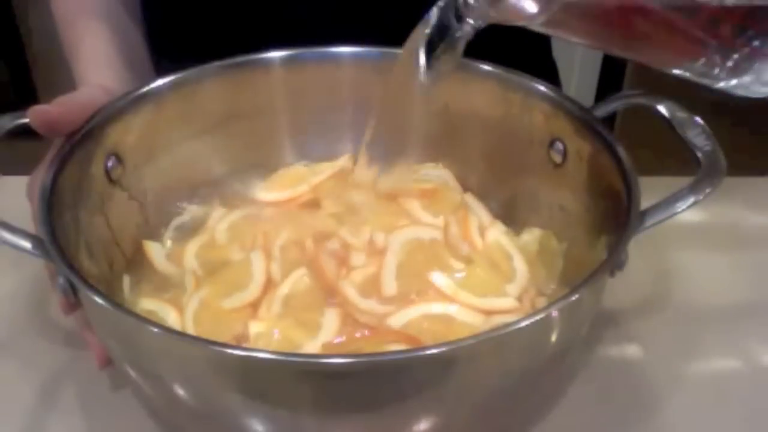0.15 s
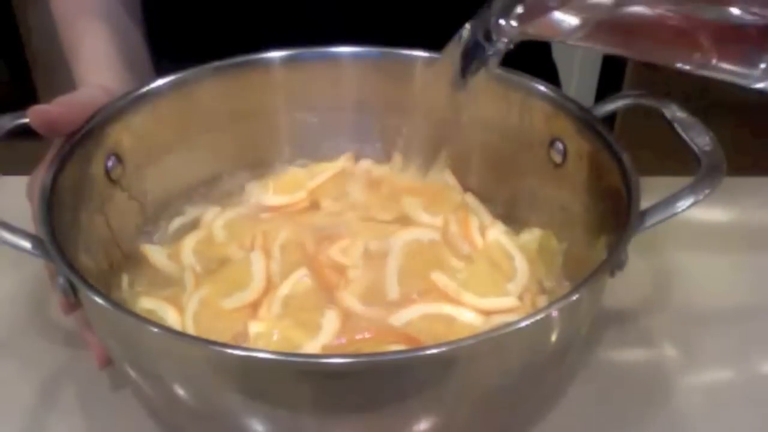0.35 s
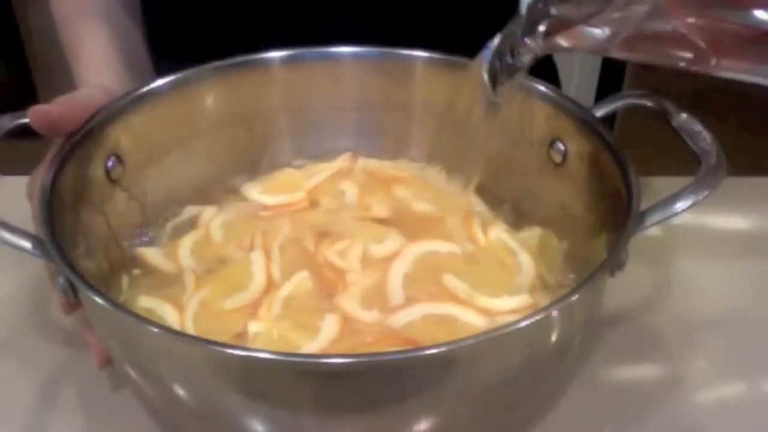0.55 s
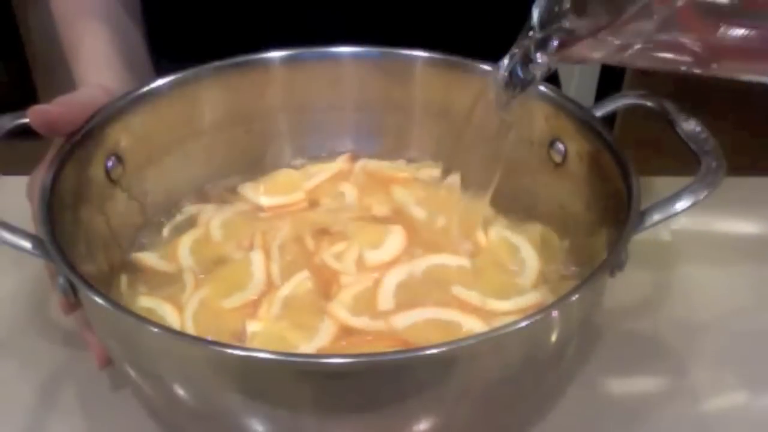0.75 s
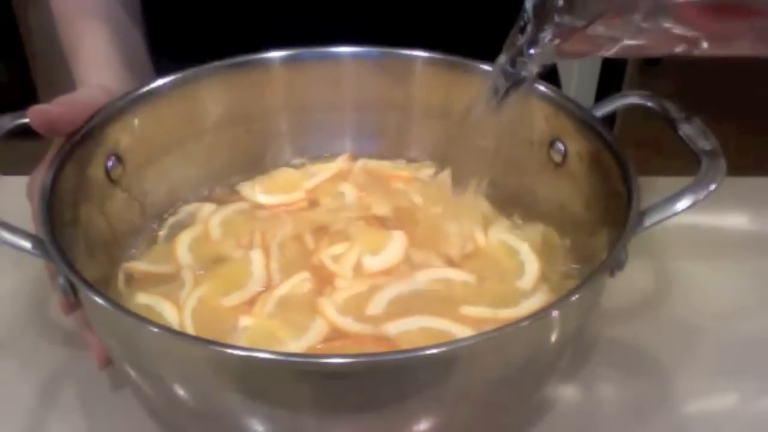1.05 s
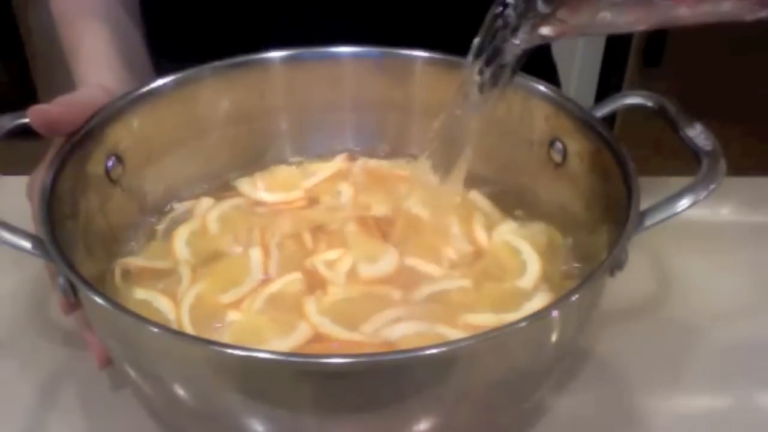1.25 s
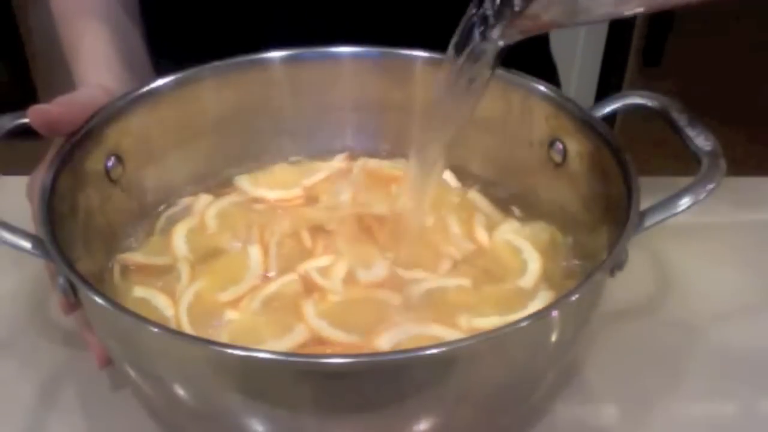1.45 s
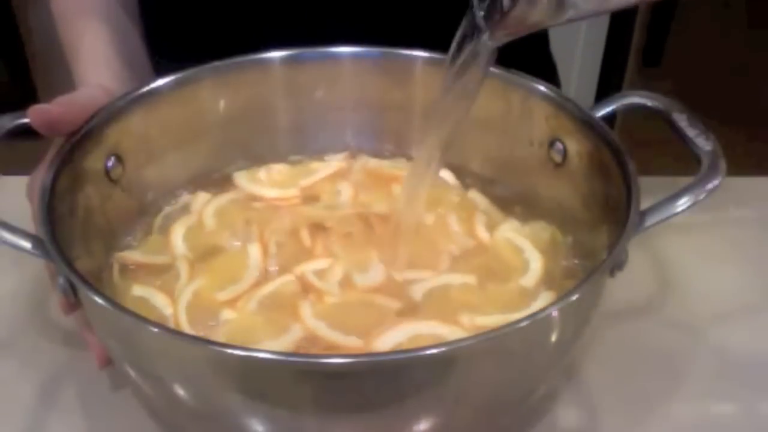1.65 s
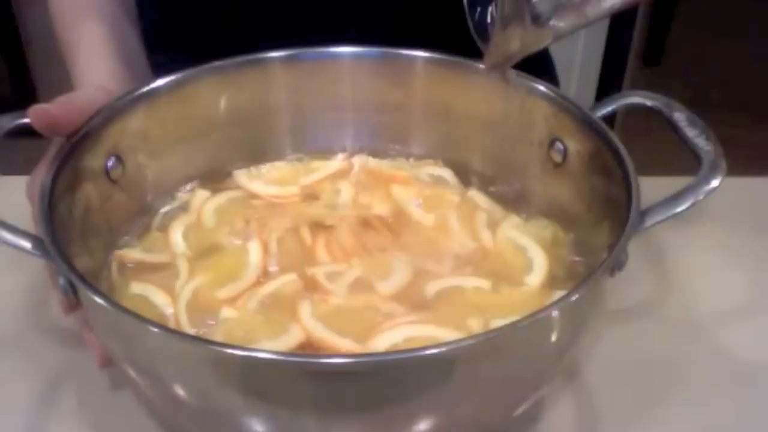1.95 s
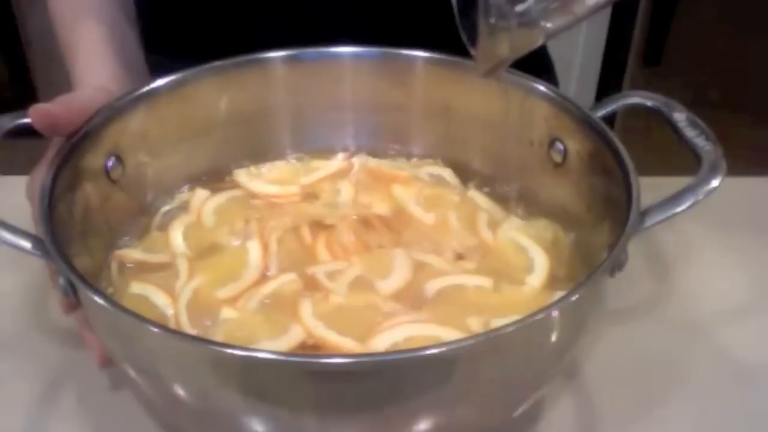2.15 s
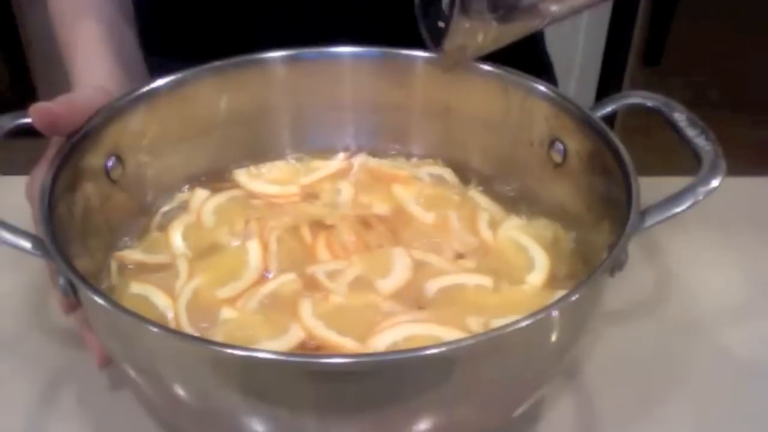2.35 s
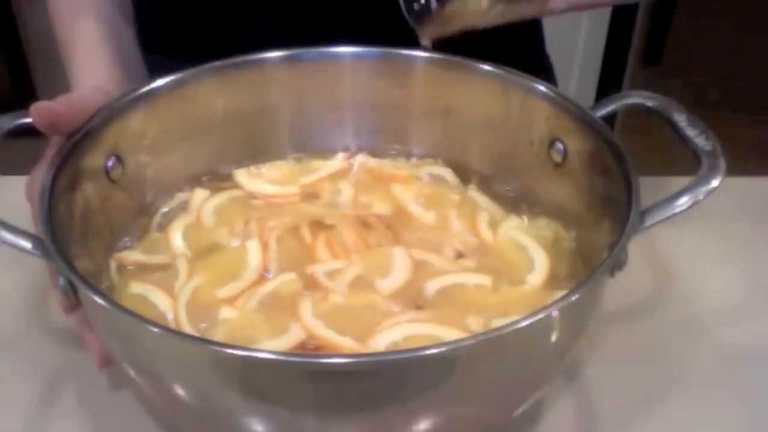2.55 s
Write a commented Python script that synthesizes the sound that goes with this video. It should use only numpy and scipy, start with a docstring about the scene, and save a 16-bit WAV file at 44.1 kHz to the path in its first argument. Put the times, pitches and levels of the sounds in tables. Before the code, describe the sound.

Water pours from a pitcher into a full pot, plinking brightly, then thins to faint drips

```python
"""Water runs from a pitcher onto sliced fruit afloat in a steel pot, over an appliance rush in a hard kitchen.
From the start, trapped air bubbles ring as short high plinks (decaying sines) over the stream's shaped-noise hiss,
a crackle of tiny bubbles and splash sprays. It thins near 0.7 s, thickens after 1.2 s and plinks loudest at 1.88 s.
From 2 s the stream fades under two last faint plinks; the rush, shaped noise with a fuzzy hum, sinks too."""
import sys
import numpy as np
from scipy import signal
from scipy.fft import rfft, irfft, next_fast_len
from scipy.io import wavfile
from scipy.ndimage import uniform_filter1d

SR = 44100
rng = np.random.default_rng(int(sys.argv[2]) if len(sys.argv) > 2 else 0)


def voltage_ratio(decibels):
    """Convert decibels (scalar or array-like) to amplitude ratios, 20 dB per decade."""
    exponent = np.asarray(decibels, float) / 20
    return 10 ** exponent


def to_wav(s):
    """Save 16-bit WAV."""
    ch = np.atleast_2d(s).T  # columns
    pcm = np.round(np.clip(ch, -1, 1) * 32767)  # PCM
    wavfile.write(sys.argv[1], SR, pcm.astype(np.int16))


N = 119070
LIFE_CYCLES = 8  # cycles to fall by 1/e at 4 kHz


def unit(x):
    """Scale to rms 1."""
    return x / np.sqrt(np.mean(x ** 2) + 1e-20)


def along(points, hz):
    """Interpolate (Hz, value) points on a log frequency axis."""
    point_hz, value = np.transpose(points)
    return np.interp(np.log(hz + 1), np.log(point_hz + 1), value)


def curves(rows):
    """One value per sample for each column after the time."""
    s, *columns = np.transpose(rows)
    return [np.interp(np.arange(N) / SR, s, column) for column in columns]


def coloured(x, spectrum):
    """Filter x by a (Hz, dB) spectrum, then scale to rms 1."""
    size = next_fast_len(N + 8192)
    gain = voltage_ratio(along(spectrum, np.fft.rfftfreq(size, 1 / SR)))
    return unit(irfft(rfft(x, size) * gain, size)[:N])


def hiss(patchy_db):
    """White noise whose gain varies in random time-frequency patches, patchy_db rms."""
    z = signal.stft(rng.standard_normal(N + 512), nperseg=256)[2]
    field = uniform_filter1d(rng.standard_normal(z.shape), size=4, axis=0)
    field = uniform_filter1d(field, size=8, axis=1)
    return signal.istft(z * voltage_ratio(patchy_db * unit(field)), nperseg=256)[1][:N]


def bubbles(peak_s, peak_db, hz, cycles):
    """Ringing air bubbles: quick swell, exponential decay; higher ones last more cycles but less time."""
    typical_hz, rise = 4000, .42  # rise: swell as a share of the life
    t = np.arange(-SR // 180, SR // 70) / SR
    age = t * (np.sqrt(hz * typical_hz) / cycles)[:, None]
    swell = np.exp(-.5 * (age / rise) ** 2)
    envelope = np.where(t < 0, swell, np.exp(-np.abs(age)))
    turns = hz[:, None] * t + rng.random((len(peak_s), 1))
    ring = voltage_ratio(peak_db)[:, None] * envelope * np.sin(2 * np.pi * turns)
    at = np.clip(np.round((peak_s[:, None] + t) * SR).astype(int), 0, N)
    return np.bincount(at.ravel(), ring.ravel(), N + 1)[:N]


# Clearest bubbles. Each row: peak time in seconds, envelope peak in dB before the water band, pitch in Hz.
PLINK_BUBBLES = [(0.099, -24.5, 10200), (0.114, -19, 5200), (0.123, -15, 6440), (0.1644, -25.5, 8460),
                 (0.1825, -24.5, 3500), (0.264, -25.5, 6680), (0.2711, -17, 4330), (0.3084, -24.5, 3000),
                 (0.31, -19, 4200), (0.3835, -15.5, 5920), (0.472, -19.5, 4210), (0.4735, -12.5, 5120),
                 (0.502, -23.5, 8560), (0.5457, -24, 4360), (0.5944, -15.5, 4210), (0.6262, -19, 4140),
                 (0.632, -25, 6550), (0.643, -26.5, 2430), (0.685, -29, 4130), (0.801, -32, 6900),
                 (0.845, -30.5, 7520), (0.8567, -27.5, 7830), (0.878, -14.5, 3765), (0.967, -22, 6670),
                 (1.0246, -19.5, 5620), (1.096, -27, 4370), (1.16, -19, 5060), (1.182, -21.5, 3660),
                 (1.188, -17.5, 4210), (1.2, -19.5, 5490), (1.233, -20.5, 3560), (1.2372, -22.5, 3630),
                 (1.2483, -27, 1800), (1.307, -20, 4880), (1.318, -13, 4190), (1.346, -22.5, 3660),
                 (1.352, -21.5, 4360), (1.417, -25, 4360), (1.436, -19, 3730), (1.443, -13.5, 3815),
                 (1.456, -21.5, 5050), (1.4843, -16, 2924), (1.502, -21.5, 3100), (1.505, -23, 7240),
                 (1.528, -13.5, 5590), (1.537, -23.5, 2460), (1.555, -17.5, 6130), (1.556, -23, 2530),
                 (1.575, -25, 4250), (1.5982, -20, 6900), (1.61, -13, 3710), (1.6144, -16, 2955),
                 (1.618, -16, 3300), (1.6248, -14, 3450), (1.626, -15, 6390), (1.633, -26, 3260),
                 (1.672, -18.5, 5700), (1.683, -16.5, 2830), (1.684, -17.5, 4520), (1.694, -23, 4170),
                 (1.6961, -21, 2460), (1.717, -18, 2900), (1.719, -20.5, 5570), (1.7224, -17.5, 4000),
                 (1.735, -26, 5760), (1.757, -16, 3760), (1.8298, -18, 6760), (1.83, -15, 3790),
                 (1.8414, -19.5, 1966), (1.852, -16.5, 6120), (1.871, -24, 3770), (1.8767, -7.5, 3750),
                 (1.8798, -11, 3530), (1.886, -9.5, 3740), (1.8908, -18, 3540), (1.9025, -19, 3600),
                 (1.9115, -35, 3750), (1.9366, -22, 5470), (1.95, -24, 4970), (1.9683, -15.5, 4540),
                 (1.979, -29, 4300), (2.103, -39.5, 5460), (2.3435, -34.5, 3600)]


def plinks(count=4):
    """Large bubbles, each dragging along smaller ones near its pitch, fainter the later they come."""
    delay_s, lead_s = .011, .003  # mean exponential delay; followers may start this early
    pitch_share, below_db, fade_db_per_s = .088, -6.5, 150
    s, db, hz = np.transpose(PLINK_BUBBLES)
    large = bubbles(s, db, hz, np.full(len(s), LIFE_CYCLES))
    u = rng.random((3, len(s), count))
    late_s = -delay_s * np.log(u[0])
    follow_s = s[:, None] + late_s - lead_s
    follow_db = db[:, None] + below_db - 8 * u[1] - fade_db_per_s * late_s
    follow_hz = hz[:, None] * (1 + pitch_share * (2 * u[2] - 1))
    life = np.full(late_s.size, LIFE_CYCLES)
    return large + bubbles(follow_s.ravel(), follow_db.ravel(), follow_hz.ravel(), life)


# Slaps. Each row: start in seconds, base level in dB of undelayed bubbles, lowest Hz, highest Hz.
SLAPS = [(.038, -46, 8800, 15700), (.535, -36, 3600, 5960), (0.307, -43, 1940, 7640),
         (0.416, -46.5, 9400, 10900), (.965, -45.5, 6250, 15400), (1.157, -49, 7500, 11400),
         (1.21, -49, 8350, 13000), (1.474, -37.5, 5000, 12700), (1.489, -42, 6560, 12500),
         (1.546, -43, 5900, 14900), (1.597, -43.5, 3960, 11300), (1.626, -44, 4700, 13800),
         (1.764, -38.5, 9050, 13200), (1.801, -42, 5000, 11700), (1.828, -37, 3100, 8470),
         (1.965, -38, 3170, 5380), (1.97, -45.5, 1124, 2320), (1.635, -39, 1440, 2500)]


def splashes(count=75):
    """Slaps throw sprays of tiny bubbles: a third of each bursts at once, the rest trails off."""
    burst_s, trail_s, fade_db_per_s = .001, .018, 130  # mean delays
    s, db, lo_hz, hi_hz = np.transpose(SLAPS)[..., None]
    u = rng.random((3, len(s), count))
    late_s = -np.log(u[0]) * np.where(np.arange(count) % 3, trail_s, burst_s)
    spray_db = db + 7 * u[1] ** 2 - fade_db_per_s * late_s
    spray_hz = lo_hz * (hi_hz / lo_hz) ** u[2]
    return bubbles((s + late_s).ravel(), spray_db.ravel(), spray_hz.ravel(), np.full(late_s.size, 7.2))


def crackle(lo_hz, hi_hz, clump=5):
    """Many small bubbles at random pitches, most of them faint, born in clumps as drops land."""
    per_s, size_spread_db, clump_s = 1050, 16, .003  # clump_s: mean delay within a clump
    u = rng.random((int(per_s * N / SR), 4))
    drops = rng.random((-(-len(u) // clump), 2))
    drops = np.repeat(drops, clump, axis=0)[:len(u)]
    s = drops[:, 0] * N / SR - clump_s * np.log(u[:, 3])
    db = size_spread_db * (u[:, 0] ** 2 + drops[:, 1] ** 2) / 2
    hz = lo_hz * (hi_hz / lo_hz) ** u[:, 1]
    return bubbles(s, db, hz, LIFE_CYCLES * (.5 + u[:, 2]))


# Stream hiss before the water band. Each row: time in seconds, middle-band dB, treble-band dB.
STREAM_LEVEL = [(0, -46, -51.5), (.2, -46.5, -48.5), (.68, -49, -50.5), (.8, -49, -57.5),
                (1.05, -51.5, -52.5), (1.2, -47, -46), (1.38, -48.5, -56.5), (1.48, -46.5, -42),
                (1.65, -43, -41.5), (1.72, -50.5, -50.5), (1.85, -45.5, -43), (1.98, -51.5, -55.5),
                (2.12, -53.5, -61), (2.7, -63, -69.5)]
# Colour of the middle layer. Each row: frequency in Hz, relative density in dB.
MIDDLE_COLOUR = [(700, -32), (1100, -7.5), (2000, -4), (3000, 4), (3700, 6), (5500, -14), (8000, -36)]
# Colour of the treble layer. Each row: frequency in Hz, relative density in dB.
TREBLE_COLOUR = [(3500, -3), (4600, -1), (8000, -8), (10000, -17.5), (13500, -9.5)]


def stream():
    """Hiss and crackle in a middle and a treble layer; a stronger flow is grainier."""
    crackle_db, crackle_grows = 3, .75  # mean dB over hiss; extra dB per dB of flow
    middle_db, treble_db = curves(STREAM_LEVEL)
    grain = voltage_ratio(crackle_db + crackle_grows * (middle_db - middle_db.mean()))

    def layer(colour, lo_hz, hi_hz):
        """Hiss plus crackle of one colour."""
        return coloured(hiss(patchy_db=1.5), colour) + grain * coloured(crackle(lo_hz, hi_hz), colour)

    middle = voltage_ratio(middle_db) * layer(MIDDLE_COLOUR, 1207, 5523)
    treble = voltage_ratio(treble_db) * layer(TREBLE_COLOUR, 4245, 17250)
    return middle + treble


# Kitchen decay. Each row: frequency in Hz, time to fall 60 dB in seconds.
KITCHEN_T60 = [(1000, .3), (10000, .2)]


def kitchen(x):
    """Hard-room reverberation: direct sound, then a noise tail dying at its own speed per frequency."""
    tail_db, gap_samples = -11.5, 200
    hz, t, z = signal.stft(rng.standard_normal(SR // 2), SR, nperseg=256)
    decay = voltage_ratio(-60 * t / along(KITCHEN_T60, hz)[:, None])
    tail = signal.istft(z * decay, SR, nperseg=256)[1]
    answer = np.pad(voltage_ratio(tail_db) * tail / np.linalg.norm(tail), (gap_samples, 0))
    answer[0] = 1  # direct sound
    return signal.fftconvolve(x, answer)[:N]


# Pass band of the water: low edge in Hz, high edge in Hz.
WATER_EDGES_HZ = [860, 10700]


def water_band(x):
    """Band-pass: the water has no bass, and the microphone rolls off its top."""
    return signal.sosfilt(signal.butter(4, WATER_EDGES_HZ, "band", fs=SR, output="sos"), x)


# Rush level without hum. Each row: time in seconds, level in dB.
RUSH_LEVEL = [(0, -42.5), (.8, -45), (1.95, -42.5), (2.15, -46), (2.7, -50)]
# Rush colour. Each row: frequency in Hz, relative density in dB.
RUSH_SPECTRUM = [(45, -34), (118, -6.5), (239, -4.5), (800, -5), (1600, -5.5), (2280, -15), (3500, -16.5),
                 (6000, -31), (13500, -48), (15000, -70)]


def rush():
    """Appliance rush: shaped noise plus a narrow noise band as a fuzzy hum, sharing its level curve."""
    hum_hz, hum_width_hz, hum_db = 271, 16, -60  # hum_db: at the rush's mean level
    level_db, = curves(RUSH_LEVEL)
    hum_colour = [(hum_hz / 2, -120), (hum_hz - 2 * hum_width_hz, -30), (hum_hz, 0),
                  (hum_hz + 2 * hum_width_hz, -30), (2 * hum_hz, -120)]
    hum = voltage_ratio(hum_db - level_db.mean()) * coloured(rng.standard_normal(N), hum_colour)
    return voltage_ratio(level_db) * (coloured(hiss(patchy_db=1.3), RUSH_SPECTRUM) + hum)


def scene():
    """Water in the kitchen over the rush."""
    water = plinks() + splashes() + stream()
    return (water_band(kitchen(water)) + rush())[None]


def top_cut(x):
    """Nothing passes above the cut-off."""
    return signal.sosfilt(signal.butter(12, 15690, fs=SR, output="sos"), x)


def record(dry):
    """The finished mix as recorded."""
    return top_cut(dry)


dry = scene()
out = record(dry)
to_wav(out)
```